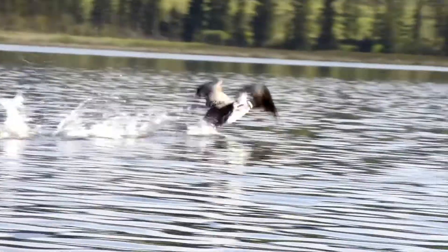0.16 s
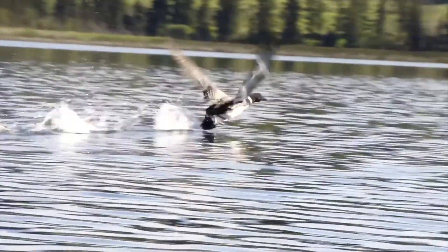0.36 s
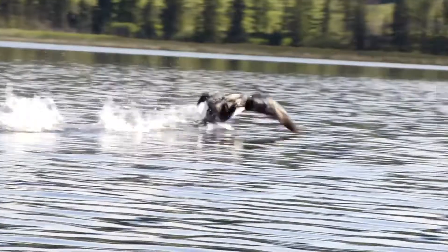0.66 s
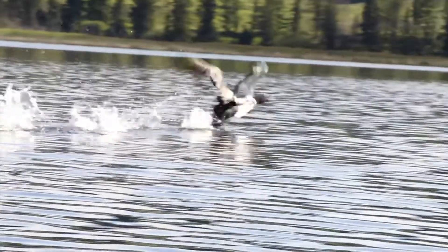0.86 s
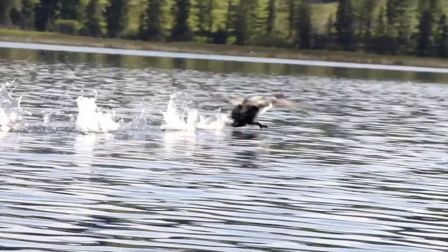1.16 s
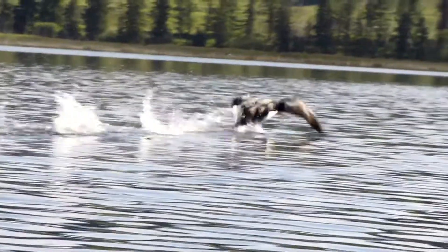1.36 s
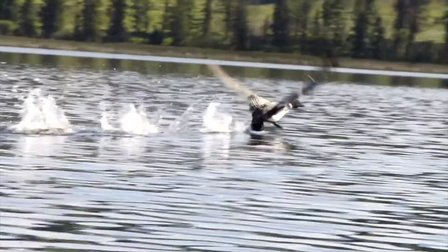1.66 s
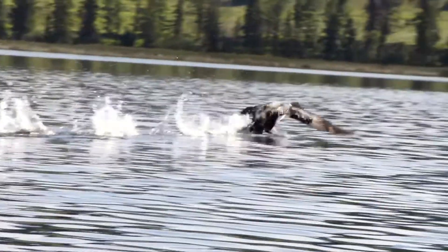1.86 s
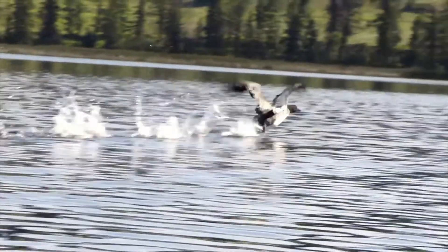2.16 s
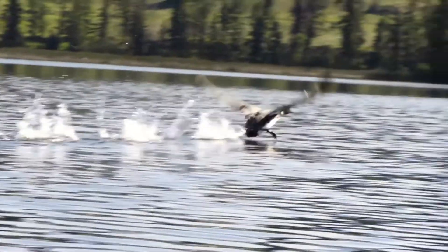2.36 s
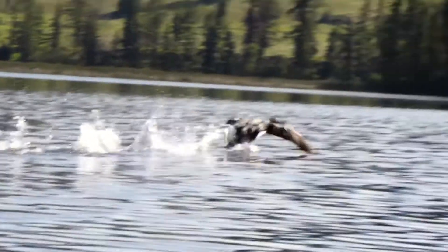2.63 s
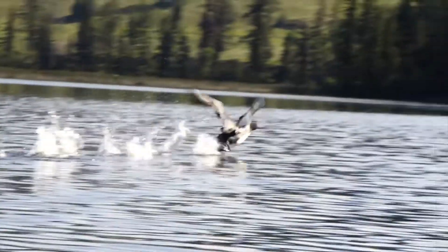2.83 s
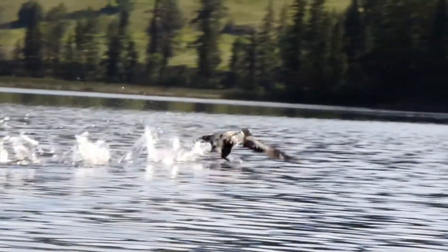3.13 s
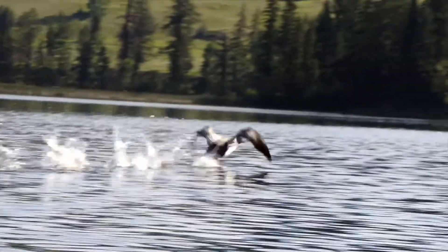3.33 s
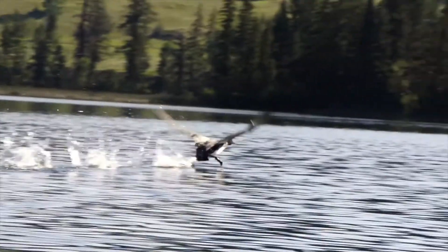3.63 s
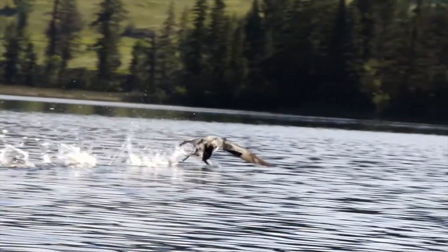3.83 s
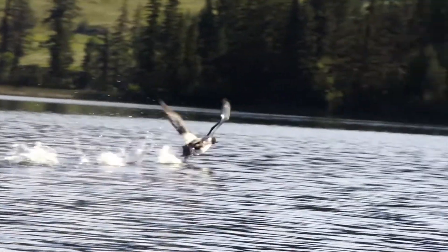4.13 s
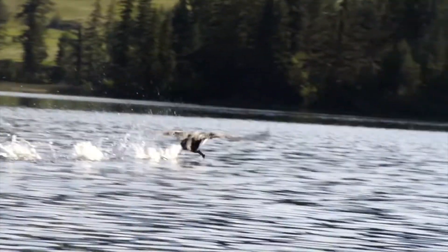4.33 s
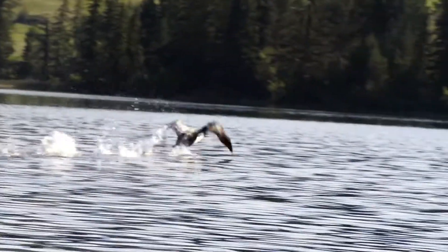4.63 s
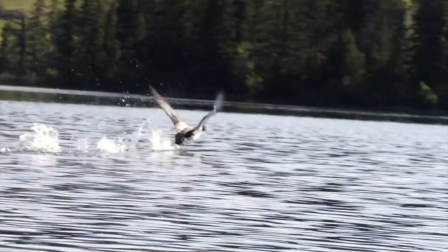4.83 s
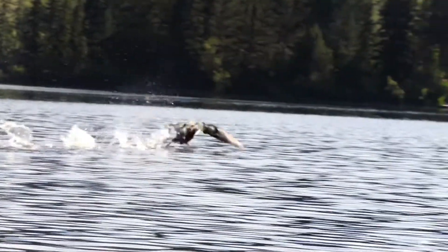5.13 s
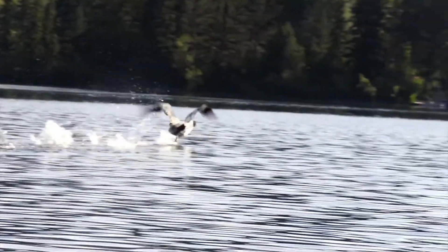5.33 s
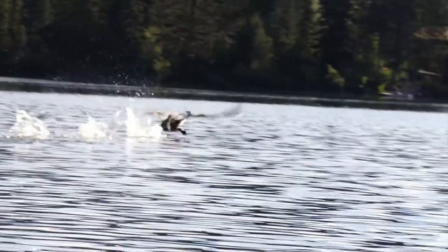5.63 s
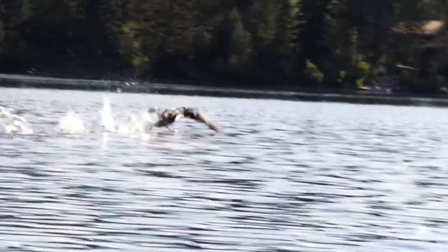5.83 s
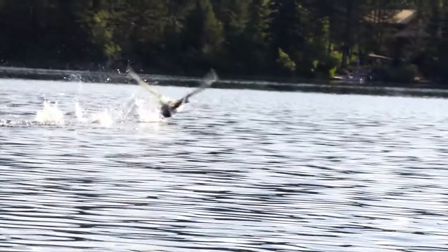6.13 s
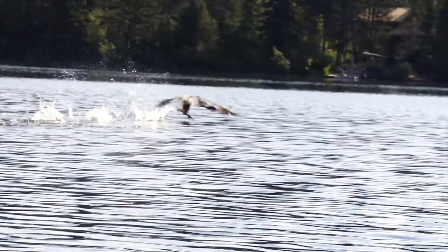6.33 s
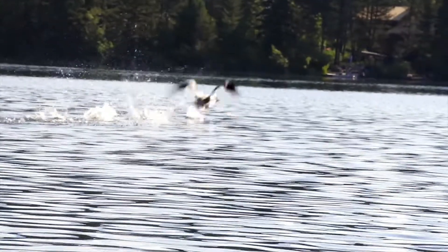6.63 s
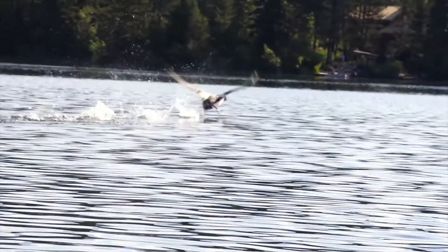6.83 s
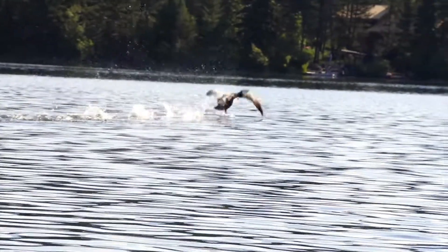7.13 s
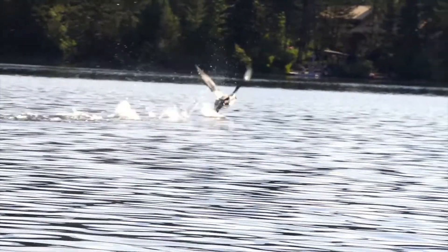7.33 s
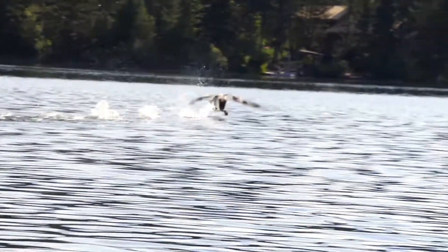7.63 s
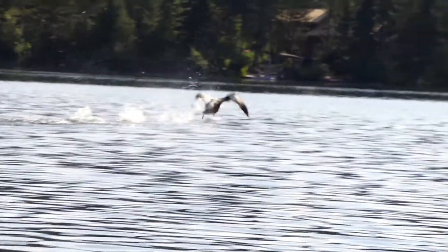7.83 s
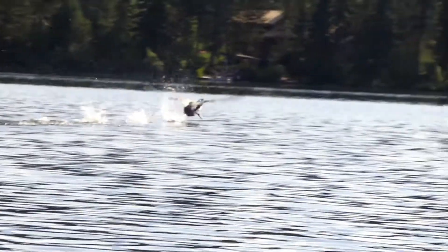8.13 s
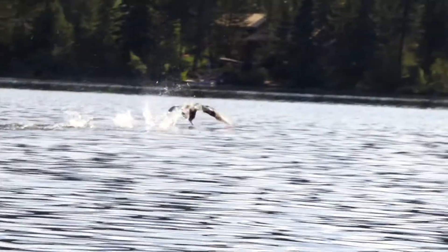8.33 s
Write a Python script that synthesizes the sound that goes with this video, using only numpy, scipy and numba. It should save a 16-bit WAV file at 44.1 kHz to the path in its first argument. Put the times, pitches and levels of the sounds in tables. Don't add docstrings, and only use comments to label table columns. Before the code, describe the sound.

Steady, quick slapping of webbed feet on open water, never stopping. Each slap snaps, drops in pitch like a popping air pocket and throws a short burst of spray. Plops, ticking droplets and faint wing thuds fill the gaps over bubbling water, with a low hull boom early on. The bird sits a little left of centre, the loose water wider; a phone on a boat captures it with muffled treble and abrupt level control.

```python
import sys
import numpy as np
from scipy import signal
from scipy.fft import rfft, irfft, next_fast_len
from scipy.io import wavfile
from scipy.ndimage import uniform_filter1d
from numba import njit

SR = 44100
rng = np.random.default_rng(int(sys.argv[2]) if len(sys.argv) > 2 else 0)


def unload_wav(signal):
    wavfile.write(
        sys.argv[1],
        SR,
        np.round(np.clip(np.atleast_2d(signal).T, -1, 1) * 32767).astype(np.int16),
    )


def invert_db(level):
    return 10 ** (np.asarray(level, dtype=float) / 20)


N = 373517

# start_s, level_db, start_hz, end_hz
FOOT_SLAPS = [(0.3205, -8.5, 2507, 359), (0.6328, -3.5, 1870, 1580), (0.6359, -6.5, 2023, 1312),
              (0.98, -3.5, 1780, 274), (1.2909, -2, 1520, 1360), (1.635, -5, 1883, 232),
              (1.9432, -16, 1750, 996), (1.952, -9.5, 2184, 1323), (1.9533, -5, 1524, 400),
              (2.2928, -5.5, 2256, 410), (2.3001, -1.7, 1500, 643), (2.599, -2.5, 1684, 211),
              (2.9495, -5, 2080, 423), (3.2647, -9, 2500, 208), (3.609, -5, 2140, 361),
              (3.9262, -2, 1864, 180.4), (4.2824, -9, 1540, 330), (4.5823, -13, 1830, 207),
              (4.5875, -1.5, 1226, 561), (4.953, -7, 2230, 347), (5.2481, -5.5, 1028, 413),
              (5.6122, -7, 2195, 366), (5.9059, -3.5, 1542, 457), (6.2677, -10.5, 2310, 380),
              (6.5658, -1.5, 1470, 548), (6.9329, -8, 2145, 345), (7.6237, -10, 1456, 305),
              (7.9263, -15.5, 1500, 302), (8.289, -10, 2604, 349), (8.2943, -12.5, 1717, 507)]
# start_s, level_db, start_hz, ring_ms
AIR_POCKETS = [(0.3255, -10.5, 555, 12), (0.3284, -6, 897, 8.2), (0.3376, -3.5, 800, 1.8),
               (0.9846, -12, 497, 13), (0.9874, -12, 857, 11), (1.2962, -13.5, 1150, 5.8),
               (1.643, -6, 456, 5.9), (1.6441, -14, 756, 9), (2.3034, -5, 269, 7.6),
               (2.3061, -10, 1090, 3.6), (2.5973, -13.5, 503, 9.8), (2.9549, -9.5, 795, 4.5),
               (2.965, -10.5, 403, 3.1), (3.2672, -2, 795, 3.4), (3.6156, 1.5, 633, 3.8),
               (3.6186, -13.5, 760, 11.0), (4.2868, -6, 864, 5.6), (4.29, -7.5, 674, 1.6),
               (4.5844, -19.5, 667, 14), (4.9594, -7, 843, 2.8), (5.6158, -15, 1138, 7.6),
               (5.6188, -14, 866, 11), (5.9092, -10, 990, 3.9), (6.2748, -1.5, 700, 4.1),
               (6.9399, -1.5, 910, 5.6), (7.2544, -14.5, 715, 6.5), (7.2598, 1.5, 752, 1.7),
               (7.626, -13.5, 962, 7.3), (7.9308, -6, 1247, 4), (8.296, -5.5, 644, 3.7)]
# start_s, peak_db, pitch_hz
WATER_PLOPS = [(0.114, -16.5, 273), (0.223, -16, 308.4), (0.438, -16, 310), (0.531, -6, 480),
               (0.896, -7, 272), (0.922, -8.5, 309), (1.044, -14, 221), (1.186, -3, 295.5),
               (1.227, -7.5, 321), (1.446, -13.5, 705), (1.939, -7, 283.6), (2.232, -9, 652),
               (2.778, -9.5, 493), (2.863, -21.5, 273), (3.117, -9, 310), (3.543, -16.5, 700),
               (3.894, -12.5, 473), (4.114, -15.5, 733), (4.21, -15.5, 281), (4.437, -10.5, 775),
               (4.855, -17.5, 289), (5.107, -11.5, 268), (5.297, -14, 270), (5.505, -19.5, 750),
               (5.697, -14, 296), (6.14, -17, 710), (6.328, -13, 744), (6.814, -14.5, 680),
               (7.343, -10.5, 288), (8.0, -14, 484)]
# start_s, peak_db, pitch_hz, left_minus_right_db
WATER_DROPS = [(0.251, -19, 1920, -7.5), (0.6235, -7.5, 1950, 0), (1.052, -24, 2318, -22),
               (1.2414, -20, 1950, -9), (1.281, -10.5, 1770, -3), (1.923, -22, 1980, 4),
               (2.5204, -24, 2090, -7.5), (3.2535, -13.5, 1500, 4.5), (3.9198, -10, 2050, -2),
               (3.9734, -17, 1980, 1), (4.2564, -20, 2480, 12), (4.306, -15, 1710, -7),
               (4.5084, -21, 1990, 4), (4.5799, -12.5, 1874, 2), (4.723, -18, 1970, -12),
               (4.883, -14.5, 2140, -8.5), (4.9748, -12, 1680, 6), (5.244, -14, 2204, 4.5),
               (5.8262, -22, 2460, 0.0), (5.8986, -15.5, 1653, 1.5), (6.23, -23, 2380, 2),
               (6.5148, -30, 3040, 2), (6.5278, -16.5, 2530, 10), (6.5863, -23, 2700, -8.5),
               (6.6074, -22.5, 2700, -9), (6.7755, -26.5, 2280, -1), (7.2534, -11, 1740, -2),
               (8.2655, -20, 2670, -11), (8.383, -21.5, 2580, 4)]
# start_s, peak_db, pitch_hz
WING_STROKES = [(0.508, -13.5, 84.9), (0.911, -19, 77.4), (1.175, -20, 69), (1.273, -15.5, 69),
                (1.517, -16.5, 96.2), (1.751, -16.5, 75.8), (1.908, -26, 71.2), (2.154, -28.5, 66.9),
                (2.43, -16, 101.8), (2.578, -20, 82), (2.866, -16, 98), (3.241, -26, 103.3),
                (3.802, -20, 102.6), (4.186, -18.5, 93.8), (4.744, -23, 116), (4.9, -20.5, 71.5),
                (5.085, -17, 78.3), (5.449, -14, 99.6), (5.602, -22.5, 84.8), (5.734, -20, 83.6),
                (6.135, -17, 86.8), (6.402, -13.5, 103.2), (6.769, -25.5, 85.4), (7.119, -18, 73.2),
                (7.602, -24.5, 69.1), (7.715, -20.5, 75), (7.815, -18, 90)]
# start_s, peak_db, pitch_hz, t60_s
HULL_KNOCKS = [
    (0.532, -16.5, 50.1, 0.63),
    (1.63, -15.5, 49.3, 0.35),
    (1.699, -22, 68.7, .45),
]
# start_s, level_db
CHURN_LEVEL = [(0.0, -37), (0.28, -29.5), (2.78, -33.5), (3.07, -32), (3.28, -33.5), (4.13, -34.5),
               (4.36, -33), (4.76, -33.5), (5.0, -33.5), (5.45, -34.5), (5.73, -31.5), (5.92, -36.5),
               (6.39, -34.5), (6.58, -37.5), (6.91, -37), (8.47, -38.5)]
# low_hz, high_hz, level_db at mean churn, churn_share, lull_share
WAKE_LAYERS = [
    (34.03, 185, -28.5, 0.37, 1.4),
    (178.77, 950, -28, 0.83, 0.76),
    (918.4, 4480, -36.5, 1.11, 0.57),
]
# freq_hz, level_db_per_hz
WAKE_SPECTRUM = [(15, -40.5), (25, -1.5), (97, 2.5), (124, -6.5), (169, -6), (203, -17), (259, -9.5),
                 (416, -21), (510, -15.5), (906, -19.5), (1000, -28), (1090, -21.5), (1280, -26.5),
                 (2190, -33.5), (3370, -37.5), (4380, -81.5), (7410, -120)]
# deepest_s, over_s, depth_db
STEP_LULLS = [
    (0.095, 0.175, 2.5),
    (0.105, 0.275, 4.5),
]
# freq_hz, side_minus_mid_db
SIDE_SPECTRUM = [(60, -13), (92, -14.5), (140, -22.5), (220, -16), (340, -13), (520, -13), (800, -10),
                 (1230, -4.5), (1900, -7.5), (2920, -4)]
# freq_hz, left_minus_right_db
LEFT_SPECTRUM = [(150, 0), (300, 1.8), (800, 1.5), (1300, 3), (2000, 0), (3000, -1), (6000, 0)]
# freq_hz, level_db_per_hz
HISS_SPECTRUM = [(2000, -12), (3000, -2), (4000, -9.5), (5300, -13.5)]

SLAP_RING_MS = 3.22
POCKET_RISE_S, GLIDE_PER_RING = .0006, .5
POCKET_REST_HZ, POCKET_LEAD_SHARE = 490, .22
STEP_GAP_S = .1
TREBLE_TOP_HZ = 2700
HISS_DB, HISS_TOP_HZ = -54.5, 5340
LIMIT_KNEE, LIMIT_RATIO, LIMIT_RELEASE_S = .46, 2.98, .19


def rms1(x):
    return x / np.sqrt(np.mean(x ** 2))


def shape(x, points):
    hz, db = np.transpose(points)
    size = next_fast_len(N + SR)
    f_hz = np.maximum(np.arange(size // 2 + 1) * SR / size, 1)
    gain = invert_db(np.interp(np.log(f_hz), np.log(hz), db))
    return irfft(rfft(x, size) * gain, size)[:N]


def band(x, lo_hz, hi_hz, order=2):
    return signal.sosfilt(signal.butter(order, [lo_hz, hi_hz], "band", fs=SR, output="sos"), x)


def low_pass(x, order, top_hz):
    return signal.sosfilt(signal.butter(order, top_hz, fs=SR, output="sos"), x)


def add(out, start_s, sound):
    i = int(start_s * SR)
    out[..., i:i + sound.shape[-1]] += sound[..., :N - i]


def burst_envelope(t, rise_s, decay_s):
    return (1 - np.exp(-t / rise_s)) * np.exp(-t / decay_s)


def grains(per_s, scatter_db):
    out, count = np.zeros(N), int(per_s * N / SR)
    when, sign, size = rng.random((3, count))
    level_db = -scatter_db * np.log(np.maximum(size, .02))
    out[(when * N).astype(int)] = np.sign(sign - .5) * invert_db(level_db)
    return out


def walk(per_s):
    k = int(SR / per_s)
    steps = np.repeat(rng.standard_normal(N // k + 1), k)
    smooth = uniform_filter1d(uniform_filter1d(steps, k), k)
    return rms1(smooth[:N])


def pocket(start_hz, end_hz, ring_s, glide_s, rise_s, order=1):
    t = np.arange(int(7 * ring_s * SR)) / SR
    turns = end_hz * t + (start_hz - end_hz) * glide_s * (1 - np.exp(-t / glide_s))
    envelope = (1 - np.exp(-t / rise_s)) * np.exp(-(t / ring_s) ** order)
    return envelope * np.sin(2 * np.pi * turns)


def claps():
    tones, spray_level = np.zeros(N), np.zeros(N)
    spray_burst = burst_envelope(np.arange(3000) / SR, 0.0004, 0.0065)
    snap = pocket(2280, 2600, 0.00081, 0.0036, 0.00052, order=2)
    thump = pocket(330, 170, 0.0046, 0.0044, 0.00025, order=2)
    blows = [(*row, SLAP_RING_MS) for row in FOOT_SLAPS]
    for s, db, hz, ring_ms in AIR_POCKETS:
        sagged_hz = POCKET_REST_HZ + POCKET_LEAD_SHARE * (hz - POCKET_REST_HZ)
        blows.append((s, db, hz, min(hz, sagged_hz), ring_ms))
    for s, db, start_hz, end_hz, ring_ms in blows:
        ring_s = ring_ms / 1000
        tone = pocket(start_hz, end_hz, ring_s, GLIDE_PER_RING * ring_s, POCKET_RISE_S, order=2)
        add(tones, s, invert_db(db + 5.5) * tone)
        add(spray_level, s, invert_db(db) * spray_burst)
    for s, db, _, _ in FOOT_SLAPS:
        add(tones, s - .0004, invert_db(db - 2.0) * snap)
        add(tones, s + 0.0013, invert_db(db - 4.5) * thump)
    droplets = invert_db(-13) * rms1(band(grains(2500, 5.7), 480, 1800))
    heave = invert_db(-11) * rms1(band(grains(500, 5.3), 92, 520))
    return tones, spray_level * (droplets + heave)


def plops():
    out = np.zeros(N)
    chance = rng.random((len(WATER_PLOPS), 2))
    for (s, db, hz), (late, detune) in zip(WATER_PLOPS, chance):
        ring_s = 3.85 / hz
        first = pocket(0.94 * hz, 1.08 * hz, ring_s, 0.036, 0.00067)
        second = pocket(hz * (1.3 + 0.9 * detune), 1.6 * hz, 0.44 * ring_s, 0.016, 0.00043)
        add(out, s, invert_db(db - 2.5) * first)
        add(out, s + 0.0028 + 0.018 * late, invert_db(db - 6) * second)
    return out


def drops():
    out = np.zeros((2, N))
    flick_envelope = burst_envelope(np.arange(600) / SR, 0.00055, 0.0051)
    for s, db, hz, pan_db in WATER_DROPS:
        tick = pocket(1.2 * hz, .8 * hz, .0008, .001, .0003)
        flick = flick_envelope * band(rng.standard_normal(600), .55 * hz, 1.2 * hz, order=3)
        sides = invert_db(db + np.clip([[pan_db], [-pan_db]], -6, 6) / 2)
        add(out, s, 0.99 * sides * tick)
        add(out, s, 1.28 * sides * flick)
    return low_pass(out, 8, 4600)


def wings_and_hull():
    out = np.zeros(N)
    wing_t60_s = .17
    for s, db, hz, t60_s in [(*row, wing_t60_s) for row in WING_STROKES] + list(HULL_KNOCKS):
        add(out, s, invert_db(db + 8) * pocket(1.42 * hz, .95 * hz, t60_s / np.log(1000), 0.0045, 0.01))
    return out


def lulls(t):
    blows = np.sort([row[0] for row in [*FOOT_SLAPS, *AIR_POCKETS]])
    steps = blows[np.diff(blows, prepend=0) > STEP_GAP_S]
    feet = STEP_LULLS[::-1] * len(steps)
    rows = []
    for s, (deep_s, over_s, depth_db) in zip(np.r_[0, steps], feet):
        rows += [(s, 0), (s + deep_s, -depth_db), (s + over_s, 0)]
    return np.interp(t, *np.transpose(rows))


def gurgles(level):
    out = np.zeros(N)
    for when, size, loud in rng.random((450, 3)):
        hz = 280 * 8.1 ** size
        bubble = pocket(hz, 1.23 * hz, 3.3 / hz, 3.5 / hz, 0.82 / hz)
        add(out, when * N / SR, invert_db(-14 * loud - 9 * size) * bubble)
    return rms1(out) * level


def wake():
    t = np.arange(N) / SR
    churn_db, lull_db = np.interp(t, *np.transpose(CHURN_LEVEL)), lulls(t)
    churn_db = churn_db - churn_db.mean()
    out = gurgles(invert_db(-35 + .8 * churn_db + lull_db))
    shared_burst = walk(24)
    for lo_hz, hi_hz, db, churn_share, lull_share in WAKE_LAYERS:
        edges_hz, layer = np.geomspace(lo_hz, hi_hz, num=4), 0
        for a_hz, b_hz in zip(edges_hz, edges_hz[1:]):
            foam = rms1(grains(.6 * a_hz, 3.5)) + .7 * rng.standard_normal(N)
            layer = layer + band(foam, a_hz, b_hz) * invert_db(walk(30) + 1.6 * shared_burst)
        level = invert_db(db + 1.5 + churn_share * churn_db + lull_share * lull_db)
        out = out + rms1(shape(layer, WAKE_SPECTRUM)) * level
    return out


def spread(wet):
    t = np.arange(4000) / SR
    scatter = rng.standard_normal(4000) * np.exp(-t / .02)
    scattered = signal.fftconvolve(wet, scatter / np.linalg.norm(scatter))[:N]
    return shape(scattered, SIDE_SPECTRUM)


def scene():
    clap, spray = claps()
    loose = spray + wake() + plops() + wings_and_hull()
    side = spread(loose)
    lean = np.array(LEFT_SPECTRUM)
    left = shape(clap + loose + side, lean * [1, .5])
    right = shape(clap + loose - side, lean * [1, -.5])
    return low_pass([left, right], 10, TREBLE_TOP_HZ) + drops()


def port_hiss():
    hiss = np.array([shape(port, HISS_SPECTRUM) for port in rng.standard_normal((2, N))])
    hiss = signal.sosfilt(signal.ellip(8, 1, 60, HISS_TOP_HZ, fs=SR, output="sos"), hiss)
    return invert_db(HISS_DB) * rms1(hiss)


@njit
def limit(peak, knee, power, keep):
    gain, held = np.empty(len(peak)), knee
    for i in range(len(peak)):
        held = max(peak[i], knee + (held - knee) * keep)
        gain[i] = (knee / held) ** power
    return gain


def roll_off(x):
    return signal.sosfilt(signal.butter(12, 16450, fs=SR, output="sos"), x)


def record(dry):
    ports = dry + port_hiss()
    peak = np.abs(ports).max(axis=0)
    gain = limit(peak, LIMIT_KNEE, 1 - 1 / LIMIT_RATIO, np.exp(-1 / (LIMIT_RELEASE_S * SR)))
    return roll_off(ports * gain)


dry = scene()
out = record(dry)
unload_wav(out)
```